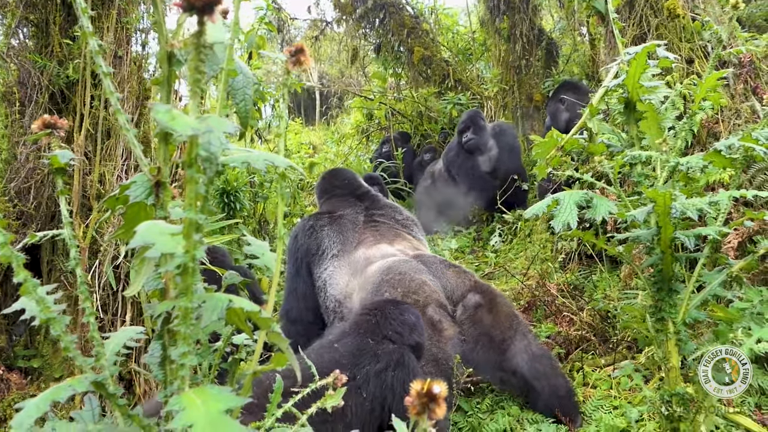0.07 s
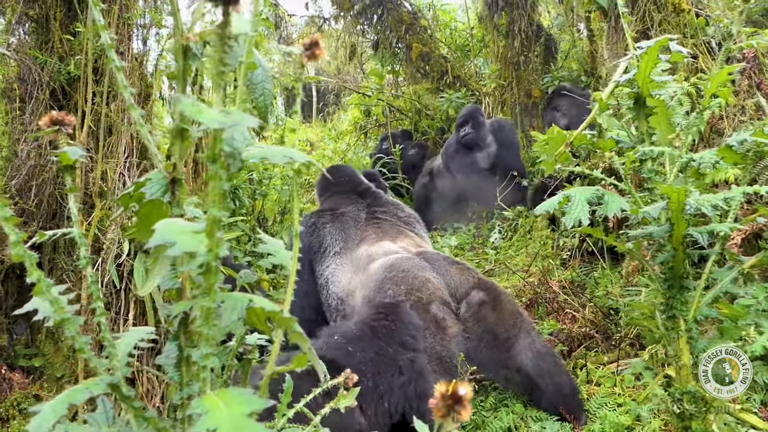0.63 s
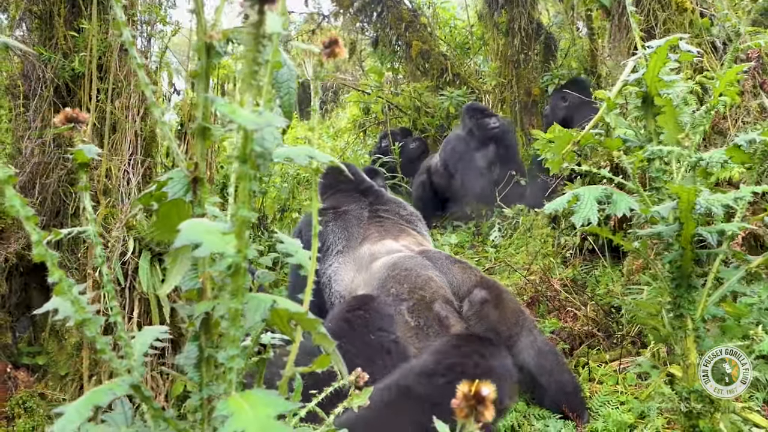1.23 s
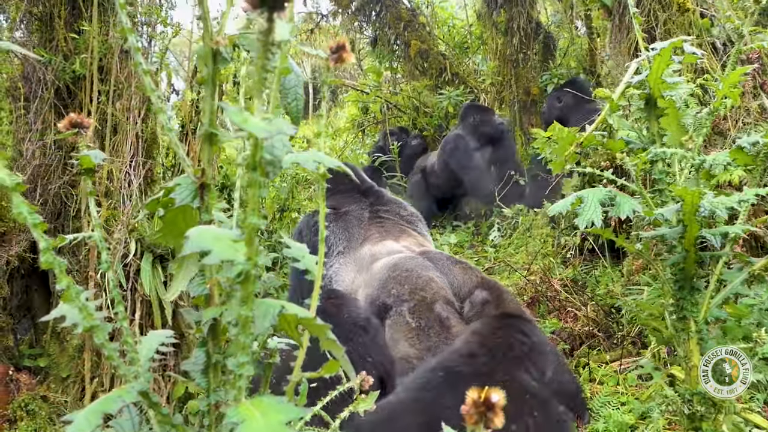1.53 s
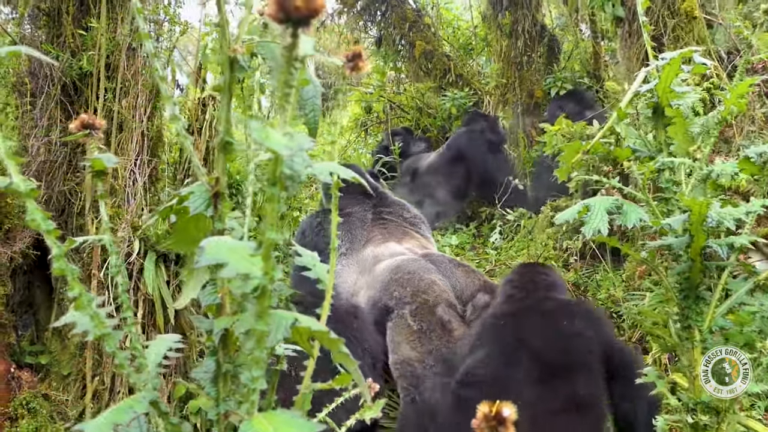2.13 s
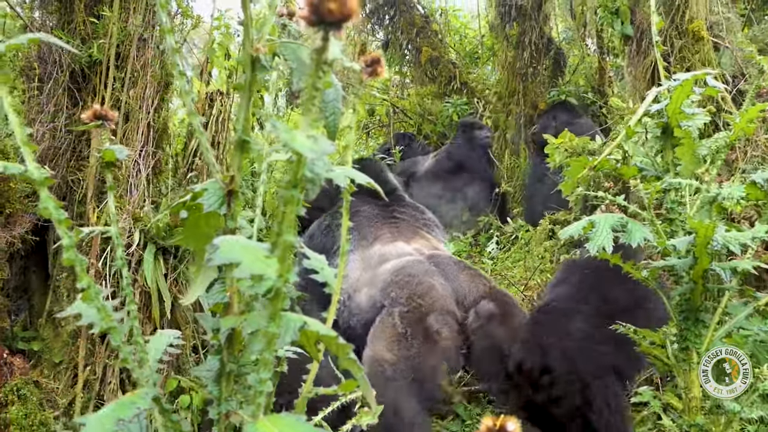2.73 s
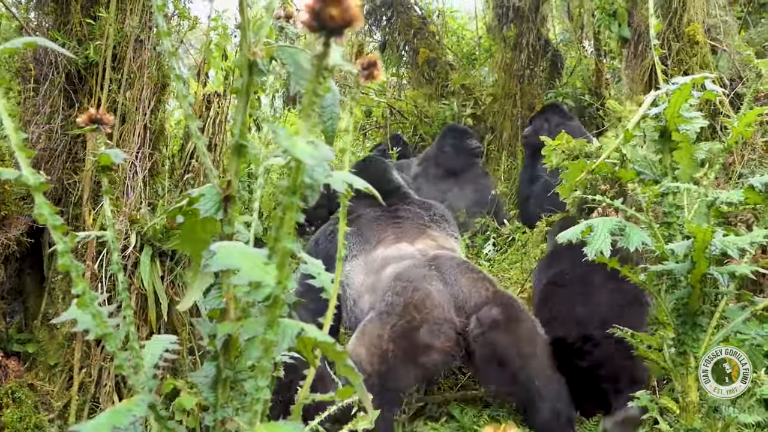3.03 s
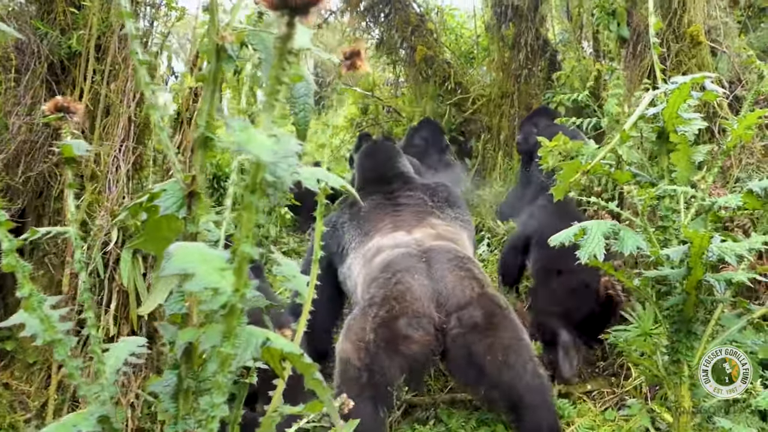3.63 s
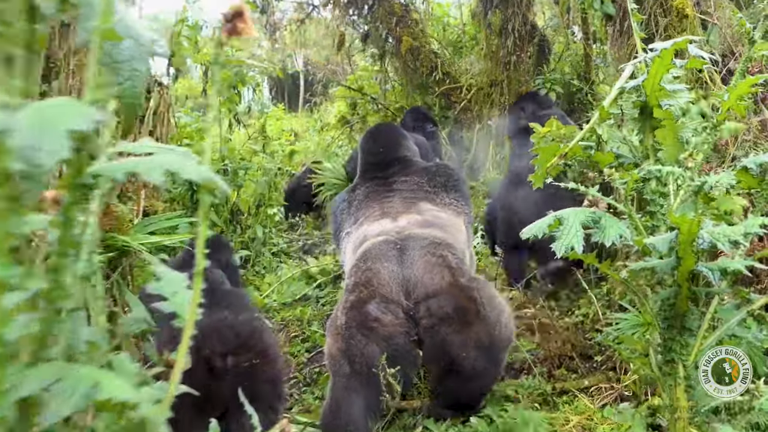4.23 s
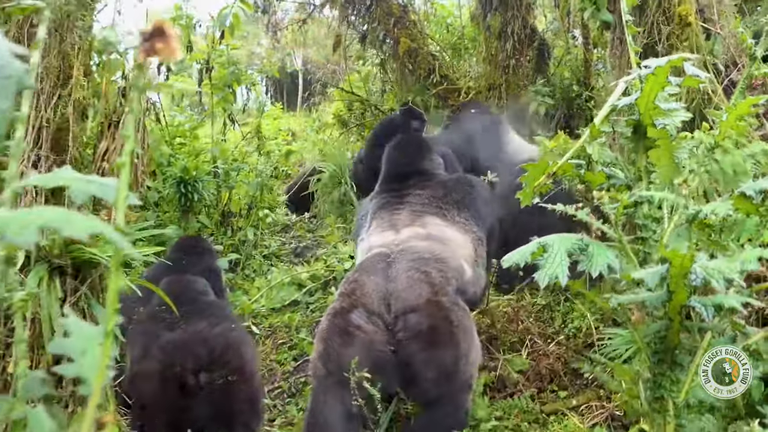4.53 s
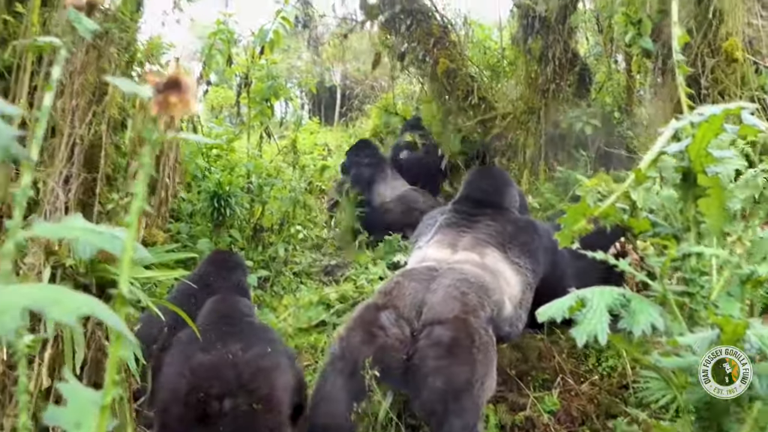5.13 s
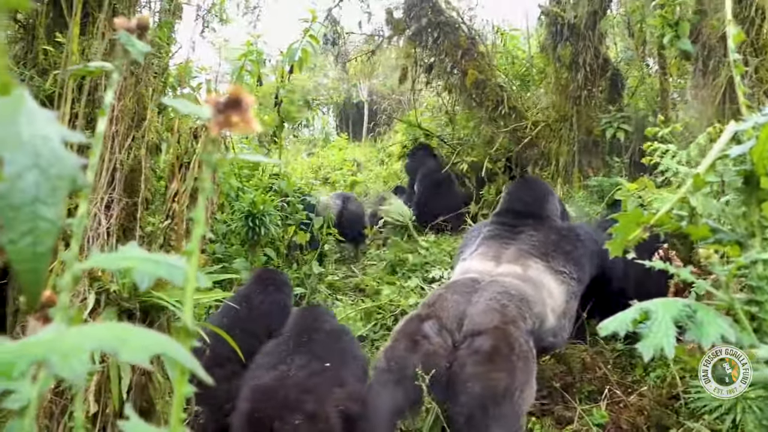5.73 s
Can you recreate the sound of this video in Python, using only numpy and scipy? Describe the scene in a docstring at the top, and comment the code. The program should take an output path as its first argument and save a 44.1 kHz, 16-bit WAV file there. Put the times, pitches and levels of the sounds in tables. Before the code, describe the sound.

Leaves rustle and stalks crack as gorillas move through forest plants, with soft thuds and a series of brief, low grunts.

```python
"""Gorillas push through dense mountain undergrowth, a few metres away.
Leaves and stalks rustle from the start, and at once a branch breaks and limbs thump on soft ground.
A faint grunt follows, then more snapping stems. From about 2 s one animal gives a run of short, low,
hoarse grunts, about three a second, its slack vocal folds flapping in the breath. Towards the end the
group starts to move: their weight shakes the soil, and the leaves rustle and crackle more and more."""
import sys
import numpy as np
from scipy import signal
from scipy.io import wavfile
from scipy.ndimage import uniform_filter1d

SR = 44100
rng = np.random.default_rng(int(sys.argv[2]) if len(sys.argv) > 2 else 0)


def bounce(signal):
    """Save signal as a 16-bit WAV file at the path given by the first command-line argument."""
    frames = np.transpose(np.atleast_2d(signal))
    limited = np.clip(frames, -1, 1)
    pcm = np.round(limited * 32767).astype(np.int16)
    wavfile.write(sys.argv[1], SR, pcm)


N = 254456
TIME = np.arange(N) / SR

# The steady stirring of the plants. Each row: time in seconds, leaf level in dB, stalk level in dB.
STIRRING = [(0, -57, -53.5), (0.48, -51, -53), (0.73, -59.5, -58.5), (0.88, -47.5, -50.5),
            (1.1, -48, -49.5), (1.36, -55, -53), (1.6, -51.5, -53), (1.9, -48, -46), (2.06, -51.5, -52.5),
            (2.45, -47, -49), (3.3, -50, -49), (3.7, -47.5, -49), (4.8, -44, -45.5), (5.08, -39.5, -43),
            (5.22, -38.5, -48), (5.48, -44.5, -44), (5.77, -35, -44)]
# A body brushes past a plant. Each row: start and length in seconds, leaf and stalk levels in dB.
SWISHES = [ (0.158, 0.13, -53, -53.5), (1.17, 0.081, -44, -42.5), (1.675, 0.12, -46.5, -43),
           (2.174, 0.2, -38.5, -48), (2.768, 0.11, -46.5, -71), (4.272, 0.067, -40, -48),
           (4.349, 0.14, -40.5, -46.5), (4.964, 0.063, -39.5, -43), (5.146, 0.21, -47, -44.5),
           (5.529, 0.21, -36, -42.5)]
# A handful of leaves is crushed. Each row: start in seconds, level in dB, 60 dB decay time in seconds.
CRUNCHES = [(.319, -45.5, 0.13), (0.5, -44.5, 0.094), (0.574, -48.5, 0.08), (1.308, -47, 0.14),
            (3.745, -39, 0.057), (3.949, -41, 0.49), (3.989, -37.5, 0.16), (4.047, -38.5, 0.13),
            (4.607, -35, 0.065), (5.428, -34.5, 0.08), (5.545, -30, 0.098), (5.649, -28, 0.14)]
# Feet shuffle, and their weight shakes the soil. Each row: time in seconds, level in dB.
SHUFFLE_LEVELS = [(0.0, -54.5), (0.6, -52.5), (1.05, -56), (1.54, -56), (2.07, -49.5), (2.44, -56.5),
                  (3.04, -48.5), (3.37, -51.5), (4.77, -48), (5.2, -49), (5.77, -51)]
TREAD_LEVELS = [(0, -93), (2.4, -70), (4.0, -54), (4.9, -53.5), (5.77, -54)]
# The tone of each bed of noise. Each row: frequency in Hz, relative spectral density in dB.
LEAF_SPECTRUM = [(1470, -19.5), (2500, 5), (2660, 1), (2940, -4), (4370, 0), (5740, 0.5), (8200, -1.5),
                 (9730, 0.5), (12700, -3.5), (14700, -6.5), (16000, -18)]
STALK_SPECTRUM = [(320, -37), (550, 4), (738, 3.5), (868, -1.5), (998, 2.5), (1440, 1.5), (1680, 0.5),
                  (1910, 1), (2340, 1.5), (2670, -7), (3500, -4.5), (4550, -23), (7700, -120)]
SHUFFLE_SPECTRUM = [(70, -13.5), (120, -12), (190, -4.5), (260, 0.5), (335, 0), (400, 0), (470, -18.5),
                    (650, -0.5)]
SOIL_SPECTRUM = [(65, -18), (110, -3.5), (190, 8.5)]
AIR_SPECTRUM = [(20, 23), (45, -3), (75, -8), (110, -14)]
# Where the rustle sits in the stereo image. Each row: frequency in Hz, left over right in dB.
RUSTLE_PAN = [(200, 0.5), (1500, -4.5), (5000, -2), (9000, 0), (13000, 4.5)]
# The ring of thick branches breaking. Each row: start in seconds, pitch in Hz, peak level in dB,
# 60 dB decay time in seconds, left over right in dB.
BRANCH_MODES = [ (0.0838, 870, -27.5, .018, -10), (0.0825, 3520, -34, 0.0017, -10),
                (1.193, 3420, -28.5, 0.0056, -2), (1.7177, 1256, -19.5, 0.021, -9),
                (1.7186, 2250, -16.5, 0.0075, -6), (1.7188, 3340, -25, .009, -7),
                (2.2268, 866, -24.5, 0.026, -1), (2.2272, 2290, -33, .02, -7),
                (2.2435, 1570, -29, .015, -14), (4.9744, 5080, -18.5, 0.0095, -1),
                (4.976, 3900, -22, 0.0065, -1), (4.9757, 9600, -26.5, .005, 1)]
# Stems and twigs break. Each row: start in seconds, peak of the crack in dB, pitch in Hz,
# damping as 1/Q, splinter energy over the crack in dB, left over right in dB.
SNAPS = [ (0.0832, -16, 1010, 2.7, -2, -15.5), (0.0908, -20.5, 970, 2.4, -12, -7),
         (0.1011, -22, 920, 1.7, 1.5, -8), (0.124, -36, 1500, 1.8, 4, -10), (0.176, -35, 1600, 1.5, 2, -19),
         (0.4072, -29, 5220, 0.19, 2.5, -8), (1.136, -30, 3800, 0.54, -3, -2),
         (1.1927, -15, 3200, 0.42, -5, -2), (1.193, -24, 860, 0.61, 4, 0), (1.1947, -31, 1980, 0.4, 5, -4),
         (1.216, -29, 3600, 2.2, 7, 0), (1.3597, -29.5, 2360, 1.7, -8, -4),
         (1.704, -19.5, 12000, 0.45, -2, 6), (1.7184, -15.5, 1690, 1.14, 5.5, -8),
         (1.727, -16, 1210, 6.3, 6.5, -3), (1.752, -38, 1250, .3, -1, -2), (1.783, -35, 2050, 0.17, 0, -4),
         (2.15, -31, 1510, 0.17, 5.5, -15.5), (2.1508, -28.5, 5130, 0.55, 4, -5),
         (2.178, -33.5, 1603, 10, 10, -9), (2.2268, -19.5, 1280, 0.94, 3.5, -6),
         (2.246, -23, 5230, 0.78, -1, -2), (2.2925, -30, 4800, .4, 0, -4),
         (2.3173, -19, 9000, 0.55, 4.5, -4), (2.318, -33.5, 2000, 1.3, 4, -7),
         (2.452, -30.5, 2368, 0.2, -5, -17), (2.9657, -21.5, 10500, 0.32, -0.5, 3),
         (3.515, -37, 2900, 0.43, 2, -7), (3.525, -34.5, 2854, .5, 8.5, -6),
         (3.631, -27, 3380, 1.17, -1, -3), (3.646, -33, 4430, .7, 9.5, -2), (3.688, -32, 2300, 1.7, 9, 2),
         (3.694, -32, 3723, .5, 0, -5), (3.7589, -10.5, 11200, 0.47, 2, 2), (3.8274, -28, 3300, 0.93, 3, 0),
         (3.8603, -26.5, 1370, 1, -3.5, -6), (3.887, -31, 4200, 0.72, 4.5, -4),
         (4.017, -24, 4800, 0.23, 2.5, -1), (4.0175, -13, 11900, 0.45, -7, 3),
         (4.2613, -28, 3520, 0.77, -3, -1), (4.2968, -25.5, 4720, 0.69, 6, 0),
         (4.3978, -27, 4870, 0.69, 5, 2), (4.411, -17.5, 6960, 0.82, 0, 1),
         (4.4365, -26.5, 1650, 0.52, 3, -6), (4.5787, -17.5, 2470, 0.37, -4.5, -2),
         (4.579, -23, 9960, 1.24, 3, 2), (4.717, -29, 2360, 0.69, 3, -6), (4.8697, -24, 5200, 2.8, 8, -2),
         (4.887, -27, 4200, 1.2, 6, -1), (4.975, -20, 5570, 2.5, 5, -1), (4.9762, -18.5, 2400, 1.4, 8, -1),
         (4.9875, -27, 4800, .5, 5, -1), (5.0109, -25, 4200, 1.2, 6, 2), (5.099, -30, 2310, .5, 1, 0),
         (5.2155, -31, 2280, 0.45, 7, 0), (5.25, -26.5, 2200, 0.78, 1, 9), (5.377, -27.5, 1860, 0.56, 2, 0),
         (5.4178, -23.5, 3370, 2.7, 6.5, -1), (5.582, -26, 1680, 0.22, -10, -2),
         (5.5878, -14, 5700, 0.37, -7, 3), (5.656, -22.5, 2940, 1.7, 7, 1)]
# Heavy blows on soft ground and thick stems. Each row: start in seconds, peak in dB, pitch ratio.
THUMPS = [(0.0849, -29, 0.66), (0.0935, -26, 1.2), (0.104, -42, 0.97), (0.143, -34, 1.05),
          (1.1936, -24, 1.23), (1.7237, -36, 0.79), (2.23, -27.5, 0.87), (4.5799, -31.5, 0.98),
          (4.7856, -24, 0.83), (4.847, -23, 0.91), (5.051, -34.5, 0.75), (5.165, -33, 1.04),
          (5.208, -34, 0.95), (5.474, -34.5, 0.62)]
# The ring of a blow at pitch ratio 1. Each row: pitch in Hz, relative level in dB,
# 60 dB decay time in seconds.
THUD_MODES = [(172, 7, 0.042), (268, 11.5, 0.054), (332, 15.5, 0.034)]
# The grunts. Each row: start and length in seconds, base pitch and base throat resonance in Hz,
# levels of hoot, chest tone, breath and nasal ring in dB, nasal ring in Hz, crests of hoot and
# chest tone as shares of the length, depth of the sag from 0 to 1, mouth resonance in Hz.
GRUNTS = [ (0.859, 0.074, 107.5, 346, -50.5, -76, -62, -65, 2220, 0.34, .6, 0.77, 730),
          (1.93, 0.0643, 105.4, 322, -36.5, -44.5, -52, -50, 2209, 0.32, 0.66, .4, 730),
          (2.210, 0.084, 116.5, 297.8, -37, -41.5, -41.5, -40.5, 2250, 0.2, 0.55, 0.7, 810),
          (2.497, 0.11, 125.8, 360, -32, -41, -45.5, -43, 2207, 0.5, 0.65, 0.6, 753),
          (2.848, 0.099, 112, 340, -40, -44, -48, -54, 2120, 0.19, 0.58, 0.94, 705),
          (3.16, 0.093, 107, 320.7, -38.5, -46.5, -43, -54, 2190, 0.4, 0.6, .4, 693),
          (3.522, 0.14, 130, 378, -40.5, -39.5, -43.5, -53, 2220, 0.42, 0.52, 0.9, 707),
          (3.790, 0.084, 163.6, 321.4, -43.5, -38.5, -50.5, -60, 2193, 0.33, 0.39, .1, 720),
          (3.844, 0.093, 110.5, 335, -40, -40, -42.5, -54, 2230, 0.19, 0.4, 0.8, 715),
          (4.098, .12, 123.5, 350, -37, -41, -45, -43, 1530, 0.33, 0.55, 0.8, 950),
          (4.375, 0.14, 116.5, 299.8, -38.5, -39.5, -52, -49, 2213, 0.23, 0.67, .3, 697.6)]
# The bend of a grunt at full depth. Each row: share of its length, pitch ratio, throat ratio.
GRUNT_BEND = [(0, 1.0, 1.08), (.3, 1.07, 1.05), (.58, .98, 1.3), (1, .68, .52)]
# The throat's formants. Each row: ratio to the grunt's throat resonance, width in Hz, relative gain in dB.
THROAT_FORMANTS = [(.66, 110, 0.5), (1.02, 91.5, 3.5)]
# The formants of the hoarse breath. Each row: centre in Hz, width in Hz, relative gain in dB.
BREATH_FORMANTS = [(950, 380, 9.5), (1530, 230, 5.5)]
# Notches in the microphone's tone. Each row: centre in Hz, sharpness as Q, depth from 0 to 1.
MIC_DIPS = [(567, 4, 0.62), (866, 16, 0.6), (2655, 11.1, 0.86), (8180, 5.2, 0.33)]


def from_db(db):
    return 10 ** (np.asarray(db) / 20)


def rms_one(x):
    return x / np.sqrt(np.mean(x ** 2) + 1e-20)


def along(rows, at):
    """Read a table's other columns at a point on its first, with straight ramps between rows."""
    first, *columns = np.transpose(rows)
    return [np.interp(at, first, column) for column in columns]


def at_hz(points, hz):
    """Read a curve on a log-frequency axis."""
    frequencies, values = np.transpose(points)
    return np.interp(np.log(hz), np.log(frequencies), values)


def cut(x, hz, kind, order=2):
    """Butterworth filter."""
    return signal.sosfilt(signal.butter(order, np.clip(hz, 10, .45 * SR), kind, fs=SR, output="sos"), x)


def resonate(x, hz, width_hz):
    """A resonance with unity gain at its peak."""
    return signal.lfilter(*signal.iirpeak(min(hz, .45 * SR), hz / min(width_hz, .4 * SR), fs=SR), x)


def glide(x, hz, width_hz):
    """A resonance whose centre sweeps."""
    turn = np.exp(2j * np.pi * np.cumsum(hz) / SR)
    pole = np.exp(-np.pi * width_hz / SR)
    return 2 * np.real(turn * signal.lfilter([1 - pole], [1, -pole], x / turn))


def evened(x, samples):
    """Hold the running rms at 1."""
    return x / np.sqrt(np.abs(uniform_filter1d(x ** 2, size=samples)) + 1e-12)


def panned(x, pan_db):
    """Lean a sound to the left by pan_db."""
    return x * from_db(np.array([[.5], [-.5]]) * pan_db)


def add(out, start, sound):
    """Mix a sound in at start seconds."""
    i = max(round(start * SR), 0)
    out[..., i:i + sound.shape[-1]] += sound[..., :N - i]


def drift(per_s):
    """A random wobble with rms 1."""
    knots = rng.standard_normal(2000)
    return rms_one(np.interp(TIME * per_s, np.arange(len(knots)), knots))


def fade(t, t60):
    """Die away by 60 dB in t60 seconds."""
    return np.exp(-np.log(1000) * t / t60)


def swell(start, length, rise, fall):
    """A rounded attack, hold and release; rise and fall are shares of the length."""
    share = (TIME - start) / length
    return np.sin(np.pi / 2 * np.clip(np.minimum(share / rise, (1 - share) / fall), 0, 1)) ** 2


def contacts(per_s, size_db, t60):
    """The power of random touches that hit at once and die away; mean 1."""
    hits = rng.random(N) < per_s * from_db(3 * drift(25)) / SR
    sizes = hits * from_db(size_db * np.minimum(rng.exponential(1, N), 3))
    power = signal.lfilter([1], [1, -fade(2 / SR, t60)], sizes ** 2 + 1e-18)
    return power / power.mean()


def rustle(spectrum, per_s, size_db, smooth, crinkle, flutter_db, mono, bands):
    """Tiny ticks and longer crinkles over a smooth swish, coloured band by band; rms 1."""
    ticks = contacts(per_s, size_db, t60=0.027)
    crinkles = crinkle ** 2 * contacts(per_s=23, size_db=-5.5, t60=0.15)
    grains = rng.standard_normal((2, 2, N)) * np.sqrt(ticks + crinkles + smooth ** 2)
    edges = np.geomspace(spectrum[0][0], spectrum[-1][0], bands + 1)
    out = 0
    for k, (low, high) in enumerate(zip(edges, edges[1:])):
        mid, side = cut(grains[k % 2], [low, high], "band")
        hz = np.sqrt(low * high)
        band = np.sqrt(1 + mono) * mid + np.sqrt(1 - mono) * side * [[1], [-1]]
        gain = from_db(at_hz(spectrum, hz) + 1.27 * drift(30))
        out = out + gain * panned(band, at_hz(RUSTLE_PAN, hz))
    return rms_one(out * from_db(flutter_db * drift(35)))


def foliage_levels():
    """Envelopes for leaves and stalks: the steady stirring, with each swish and crunch on top."""
    levels = from_db(along(STIRRING, TIME))
    for start, length, leaf_db, stalk_db in SWISHES:
        swish = from_db([[leaf_db], [stalk_db]]) * swell(start, length, rise=0.33, fall=0.34)
        levels = np.hypot(levels, swish)
    for start, db, t60 in CRUNCHES:
        crunch = from_db(db) * (TIME >= start) * fade(np.abs(TIME - start), t60)
        levels[0] = np.hypot(levels[0], crunch)
    return levels


def foliage(leaf_level, stalk_level):
    """Bodies brush the plants: crisp leaves on top, drier stalks in the mids."""
    leaves = rustle(LEAF_SPECTRUM, per_s=320, size_db=10, smooth=2.27, crinkle=1,
                    flutter_db=1.07, mono=0.65, bands=14)
    stalks = rustle(STALK_SPECTRUM, per_s=250, size_db=3.5, smooth=1.1, crinkle=0.3,
                    flutter_db=1, mono=0.5, bands=10)
    return leaf_level * leaves + stalk_level * stalks


def footwork(shuffle_trim_db=1):
    """Feet shuffle over the ground, and the weight of moving bodies shakes the soil."""
    shuffle = rustle(SHUFFLE_SPECTRUM, per_s=320, size_db=2.5, smooth=1.3, crinkle=0.42,
                     flutter_db=0.77, mono=0.011, bands=10)
    tread = rustle(SOIL_SPECTRUM, per_s=33, size_db=3.5, smooth=0.41, crinkle=0.2,
                   flutter_db=3.5, mono=0.5, bands=3)
    shuffle_db, = along(SHUFFLE_LEVELS, TIME)
    tread_db, = along(TREAD_LEVELS, TIME)
    return from_db(shuffle_db + shuffle_trim_db) * shuffle + from_db(tread_db) * tread


def open_air():
    """The faint rumble of the open air lies under everything."""
    return from_db(-84) * rustle(AIR_SPECTRUM, per_s=100, size_db=1, smooth=2, crinkle=0,
                                 flutter_db=2, mono=0.45, bands=3)


def crackles(leaf_level, per_s=70, ring_cycles=11, pitches=12):
    """Tiny twigs and leaf ribs give way in clusters of pings, louder as the plants stir."""
    hits = rng.random(N) < per_s * from_db(5 * drift(14)) / SR
    sizes = hits * leaf_level * from_db(3.5 + 3 * np.minimum(rng.exponential(1, N), 2.5))
    pitch_index = rng.integers(0, pitches, N)
    out = 0
    for k, hz in enumerate(np.geomspace(2200, 7500, pitches)):
        pole, angle = fade(1 / SR, ring_cycles / hz), 2 * np.pi * hz / SR
        kicks = sizes * (pitch_index == k) + 1e-18
        ring = signal.lfilter([0, np.sin(angle)], [1, -2 * pole * np.cos(angle), pole ** 2], kicks)
        out = out + panned(ring, at_hz(RUSTLE_PAN, hz) + rng.normal(0, 3))
    return out


def branches():
    """Thick branches ring for an instant as they break; the ring builds while the wood gives."""
    out, t = np.zeros((2, N)), TIME[:SR // 8]
    for start, hz, db, t60, pan_db in BRANCH_MODES:
        envelope = (1 - np.exp(-t * hz / 2)) * fade(t, t60)
        ring = envelope / envelope.max() * np.sin(2 * np.pi * hz * t)
        add(out, start, panned(from_db(db) * ring, pan_db))
    return out


def wood(force, hz, damping):
    """A stem answers a force with one broad, band-limited resonance."""
    return cut(resonate(force, hz, hz * damping), [0.15 * hz, 1.81 * hz], "band")


def snaps():
    """A stem gives with one crack, and its fibres splinter after it."""
    out, t = np.zeros((2, N)), TIME[:6000]
    click = 1. * (t == 0)
    for start, db, hz, damping, splinter_db, pan_db in SNAPS:
        t60 = 0.034 * (1000 / hz) ** 0.1  # thinner, higher twigs finish sooner
        bursts_db = 2.5 * np.repeat(rng.standard_normal(len(t) // 40), 40)
        fibres = rng.standard_normal((3, len(t))) * from_db(bursts_db) * fade(t, t60)
        fibres = fibres[0] + 0.13 * fibres[1:]  # a little stereo width
        force = click + from_db(splinter_db) * fibres / np.sqrt(np.sum(fibres ** 2) / 2)
        snap = wood(force, hz, damping) / np.abs(wood(click, hz, damping)).max()
        add(out, start, panned(from_db(db) * snap, pan_db))
    return out


def thumps():
    """Limbs land on thick stems and the soft forest floor; heavier ones sound lower and longer."""
    out = np.zeros(N)
    for start, db, ratio in THUMPS:
        t = TIME[:SR // 4] * ratio
        modes = sum(from_db(mode_db) * fade(t, t60) * np.sin(2 * np.pi * hz * t)
                    for hz, mode_db, t60 in THUD_MODES)
        thud = cut(modes, [115, 520], "band")
        add(out, start, -from_db(db) * thud / np.abs(thud).max())
    return out


def grunt_controls(hoot_share=0.95, taper=1.2):
    """Four envelopes and four frequency curves: the hoot leads, and the nasal ring swells late."""
    hoot, chest, breath, nasal = np.zeros((4, N))
    pitch_hz, throat_hz, nasal_hz, mouth_hz = np.zeros((4, N))
    for (start, length, pitch, throat, hoot_db, chest_db, breath_db, nasal_db, nose,
         hoot_crest, chest_crest, depth, mouth) in GRUNTS:
        on = (TIME >= start) & (TIME < start + 2)
        # Pitch and throat both sink as the push runs out.
        sag, closing = np.power(along(GRUNT_BEND, (TIME[on] - start) / length), depth)
        pitch_hz[on], throat_hz[on] = pitch * sag, throat * closing
        nasal_hz[on], mouth_hz[on] = nose, mouth
        hoot += from_db(hoot_db) * swell(start, length * hoot_share, hoot_crest / hoot_share, fall=0.59)
        chest += from_db(chest_db) * swell(start, length, chest_crest, 1 - chest_crest) ** taper
        breath += from_db(breath_db) * swell(start, length, rise=0.41, fall=0.42) ** taper
        nasal += from_db(nasal_db) * swell(start, length, rise=0.72, fall=0.28)
    return (hoot, chest, breath, nasal), (pitch_hz, throat_hz, nasal_hz, mouth_hz)


def grunts(jitter=0.095, shimmer_db=6, rasp=0.45, puff_depth=0.86):
    """Slack vocal folds flap unevenly, shaking the chest, ringing the throat and puffing out breath."""
    envelopes, (pitch_hz, throat_hz, nasal_hz, mouth_hz) = grunt_controls()
    cycles = np.cumsum(pitch_hz * np.exp(jitter * drift(110))) / SR
    flaps = np.diff(np.floor(cycles), prepend=0) * from_db(shimmer_db * drift(110))
    throat_air, mouth_air = rng.standard_normal((2, N)) * (1 + puff_depth * np.cos(2 * np.pi * cycles))
    voice = rms_one(flaps) + rasp * throat_air
    hoot = sum((-1) ** k * from_db(db) * glide(voice, ratio * throat_hz, width)
               for k, (ratio, width, db) in enumerate(THROAT_FORMANTS))
    hoot = evened(cut(hoot, [145, 465], "band", order=4), samples=800)
    chest = rms_one(np.sin(2 * np.pi * cycles) * from_db(2 * drift(90)))
    hoarse = sum(from_db(db) * resonate(mouth_air, hz, width) for hz, width, db in BREATH_FORMANTS)
    mouth = from_db(20.5) * glide(mouth_air, mouth_hz, width_hz=41)
    breath = evened(cut(hoarse + mouth, [620, 2200], "band", order=3), samples=1200)
    nasal = evened(glide(throat_air, nasal_hz, width_hz=49), samples=1200)
    return sum(envelope * layer for envelope, layer in zip(envelopes, (hoot, chest, breath, nasal)))


def forest_reverb(x, near_t60=0.22, far_t60=0.73, near_db=-11, far_db=-21, top_hz=11000):
    """Nearby plants scatter a short halo; trunks further off return a faint tail."""
    t = TIME[:SR * 3 // 4]
    scatter = rng.standard_normal((2, 2, len(t))) * (1 - np.exp(-t / 0.00043))
    response = 0
    for noise, t60, db in zip(scatter, (near_t60, far_t60), (near_db, far_db)):
        tail = noise * fade(t, t60)
        response = response + from_db(db) * tail / np.sqrt(np.sum(tail ** 2) / 2)
    return signal.fftconvolve(x, cut(response, top_hz, "low"), axes=-1)[:, :N]


def scene():
    """Breaking wood, thumps and grunts get the forest's reverb, over a dry bed of rustle and air."""
    leaf_level, stalk_level = foliage_levels()
    bed = foliage(leaf_level, stalk_level) + footwork()
    bodies = panned(grunts() + thumps(), pan_db=-1.5)
    spots = bodies + snaps() + branches() + crackles(leaf_level)
    return bed + open_air() + cut(spots + forest_reverb(spots), 66, "high", order=4)


def record(dry, top_hz=15750):
    """The microphone carves four narrow dips, and a steep low-pass takes off the top."""
    for hz, q, depth in MIC_DIPS:
        dry = dry - depth * resonate(dry, hz, hz / q)
    return signal.sosfilt(signal.ellip(10, .1, 80, top_hz, fs=SR, output="sos"), dry)


dry = scene()
out = record(dry)
bounce(out)
```